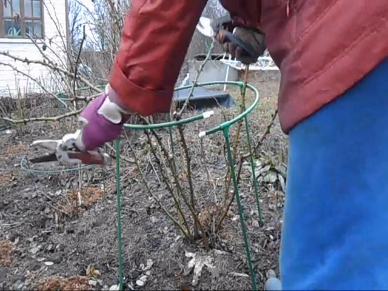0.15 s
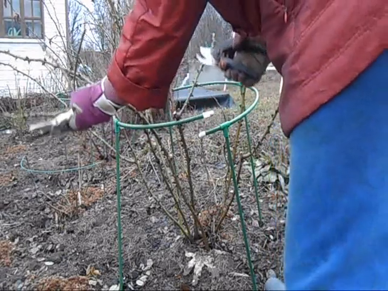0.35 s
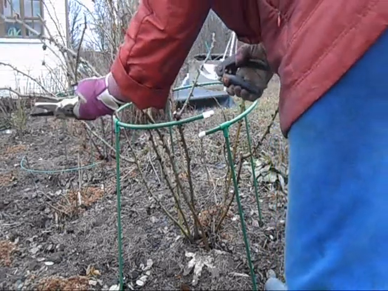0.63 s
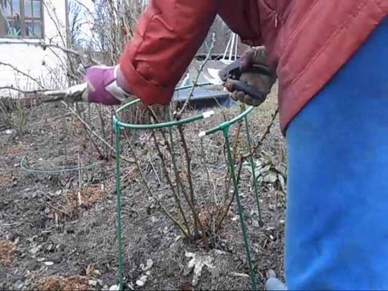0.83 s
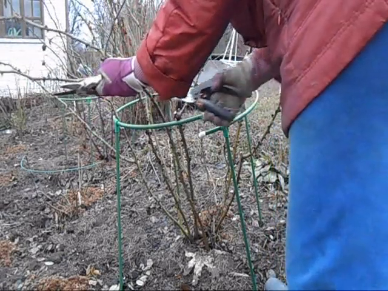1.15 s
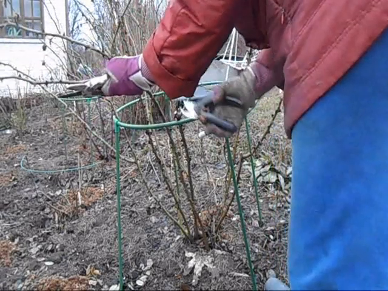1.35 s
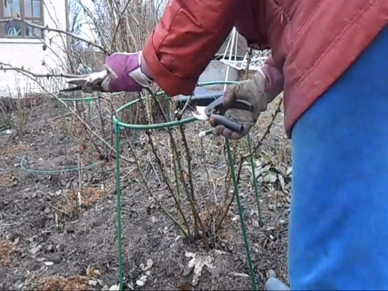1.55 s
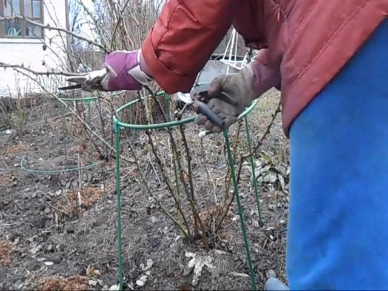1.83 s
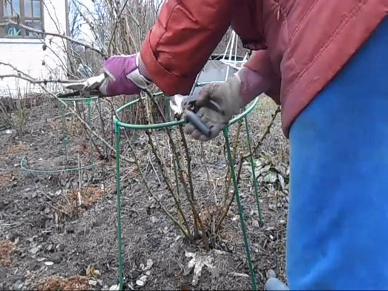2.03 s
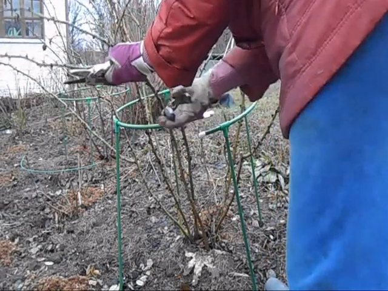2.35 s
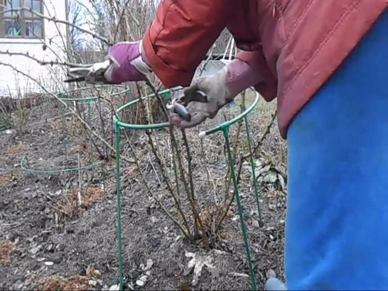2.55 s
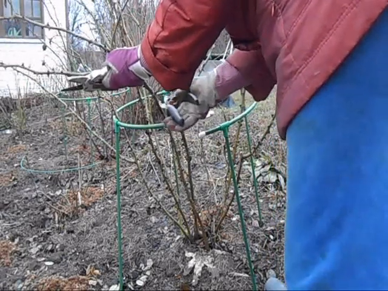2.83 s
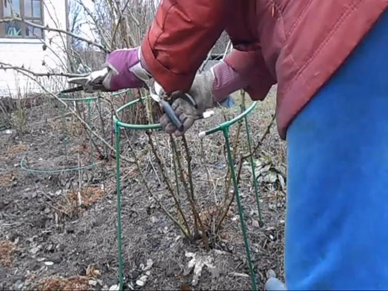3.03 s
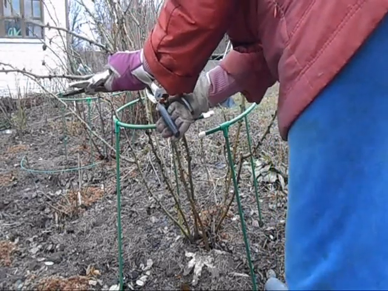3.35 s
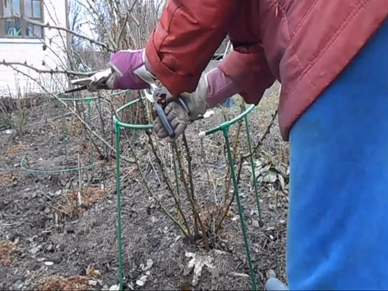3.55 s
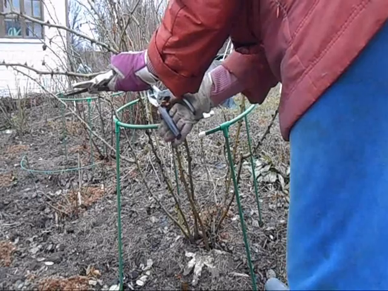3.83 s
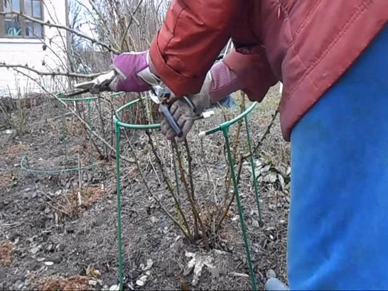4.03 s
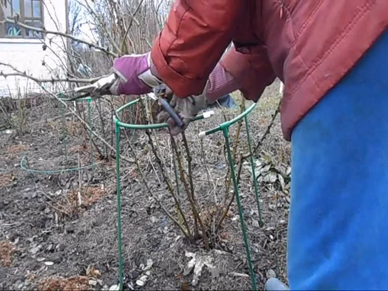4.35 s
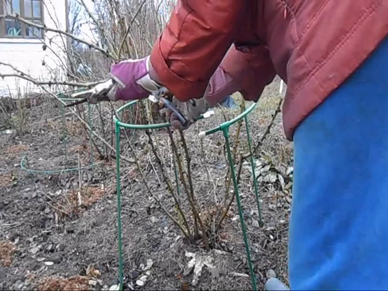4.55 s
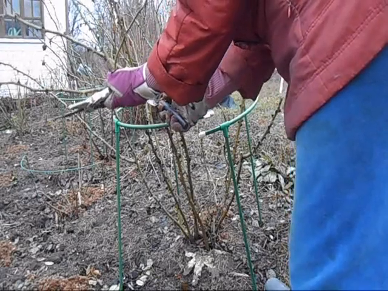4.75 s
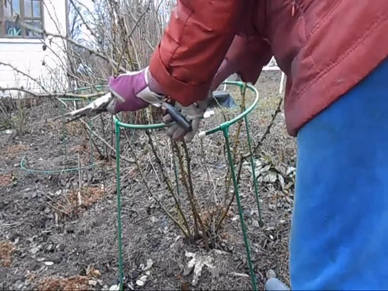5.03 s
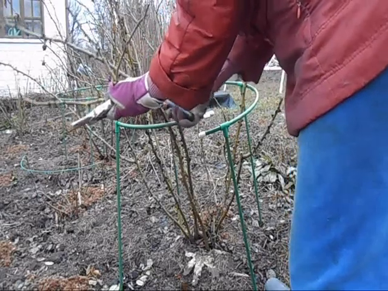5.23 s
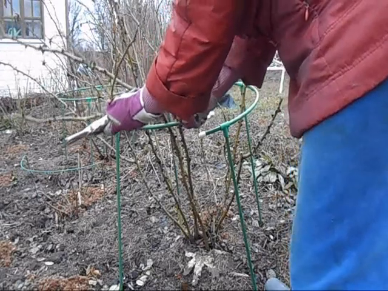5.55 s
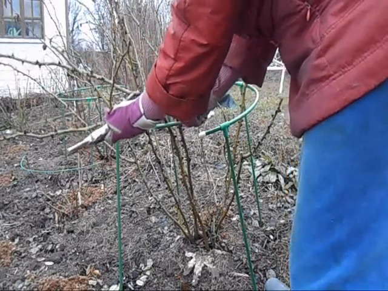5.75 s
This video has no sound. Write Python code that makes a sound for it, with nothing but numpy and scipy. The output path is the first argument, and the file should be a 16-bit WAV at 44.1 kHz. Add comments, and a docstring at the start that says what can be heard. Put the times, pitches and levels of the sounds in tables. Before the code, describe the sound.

Right at the start, hand shears cut a rose stem with a sharp, close double snap. Jacket sleeves swish while a small bird nearby gives three thin, very high whistles in the first half second. Thorns scratch lightly on cloth from 0.6 seconds, and the steel jaws clack twice at about 1.1 and 1.2 seconds. The rustling then softens. The bird makes short, hoarse notes around 2.2 to 2.5 seconds and falling chirps around 2.7 to 3.2, while a farther bird gives six quick buzzes between 2.5 and 3.5. Canes scrape faintly at 3.2 seconds. From 4.3 seconds thorn scratches and rustling return and build, with more hoarse bird notes, until the loudest stem snap at 5.6 seconds, surrounded by a high whistle and a falling chirp. Quiet outdoor air with a faint low drone runs underneath, and the birds carry a slight echo.

```python
"""Hand shears prune a rose bush: stems snap, steel jaws clack, thorns scratch on cloth, canes rub.
The gardener's jacket folds, slides and crinkles. A small bird whistles, chips and scolds nearby;
another buzzes farther off. Trees and a wall echo shears and birds over quiet air and a faint drone.
A pocket camera samples it all at half rate and holds each sample twice."""
import sys
import numpy as np
from scipy import signal
from scipy.fft import rfft, irfft, next_fast_len
from scipy.io import wavfile
from scipy.ndimage import map_coordinates

SR = 44100
rng = np.random.default_rng(int(sys.argv[2]) if len(sys.argv) > 2 else 0)


def generate_wav(signal):
    """Clip the signal to [-1, 1] and save it as 16-bit WAV at the path in sys.argv[1]."""
    frames = np.transpose(np.atleast_2d(signal))
    scaled = np.clip(frames, -1, 1) * 32767
    pcm = np.round(scaled).astype(np.int16)
    wavfile.write(sys.argv[1], SR, pcm)


N = 259659

# Table levels are relative; the functions apply further gain.
# Stems breaking. Each row: start in seconds, level in dB, pitch in Hz, splinter level in dB.
SNAPS = [(0.0455, -15, 3030, -30), (0.0850, -3.5, 2180, -40), (5.614, 1, 1810, -11.5)]
# Jaws and handles knocking. Each row: start in seconds, level in dB, cane thump in dB.
CLACKS = [(1.0757, -20.5, -28.5), (1.107, -33.5, -34.5), (1.177, -36, -35.5), (1.2414, -18.5, -27),
          (1.3449, -30.5, -42)]
# Steel resonances. Each row: frequency in Hz, level in dB, T60 in seconds.
SHEAR_MODES = [(470.5, -17, 0.19), (718, -18, 0.11), (1090, -12, 0.024), (1630, 0, 0.049),
               (2070, -2.5, 0.036), (2330, -16, 0.033), (2870, -4.5, 0.047), (3430, -8, 0.034),
               (3770, 5.5, 0.024), (4520, 3, 0.013), (4930, -8, .016), (5950, -21, .015)]
# Fibres tearing, thorns on cloth. Each row: start in seconds, level in dB, decay in seconds, pitch in Hz.
SCRATCHES = [(0.622, -40, 0.049, 3740), (0.687, -34, 0.016, 3220), (0.9, -29, 0.0083, 5100),
             (1.092, -35, 0.019, 3600), (4.3195, -45.5, 0.0056, 3100), (4.385, -34.5, .022, 4430),
             (4.66, -40.5, 0.0048, 3900), (4.682, -37, .007, 4120), (5.306, -32.5, 0.0089, 3240),
             (5.421, -35, .007, 4540), (5.477, -28, 0.0099, 3000), (5.581, -32, 0.016, 4400),
             (5.656, -28, 0.013, 3850), (5.726, -37, 0.033, 4430)]
# Cane on cane. Each row: start in seconds, level in dB, decay in seconds.
RUBS = [(3.223, -42.5, 0.027), (3.246, -43, .05)]
# Spectra of cracking fibre, rubbed cane, sliding cloth, folding cloth and distant air.
# Each row: frequency in Hz, level in dB.
FIBRE_SPECTRUM = [(300, -39), (1000, 17.5), (2500, 10), (4500, 15), (7000, 8.5), (10000, -20)]
CANE_SPECTRUM = [(150, -14), (450, -1.5), (900, -1), (2200, -0.5), (4000, -2), (8000, -25)]
SWISH_SPECTRUM = [(150, -24.5), (300, -12), (600, -7.5), (1100, -4), (2200, 2), (4000, -1.5), (6500, -6.5),
                  (8000, -9), (10300, -24.5)]
FOLD_SPECTRUM = [(50, -8.5), (100, -7), (240, -5.5), (520, 0.5), (850, 0.5), (1400, -1.5), (4000, -28),
                 (7000, -82)]
AIR_SPECTRUM = [(15, -21), (30, -26), (60, 5), (150, 2), (400, 5), (900, 4), (2100, 2), (4700, -3.5),
                (6500, -15), (10300, -43)]
# The gardener's briskness. Each row: time in seconds, rustle in dB.
MOVEMENT = [(0.0, -36), (0.23, -39), (0.41, -42.5), (1.16, -49), (1.36, -45.5), (1.62, -52.5), (1.98, -52),
            (2.5, -51.5), (2.64, -55), (2.88, -55), (3.34, -51.5), (4.11, -60), (4.39, -59), (4.58, -52.5),
            (5.29, -47.5), (5.52, -43), (5.75, -47.5), (5.88, -50)]
# Sleeve strokes. Each row: centre in seconds, length in seconds, swish in dB, fold in dB.
STROKES = [(0.032, 0.17, -30.5, -48), (0.31, 0.28, -34.5, -51), (0.617, 0.34, -49.5, -50.5),
           (1.046, 0.52, -42.5, -51), (1.533, 0.67, -55, -50.5), (2.397, .2, -49, -59),
           (2.613, 0.19, -49, -59), (3.408, 0.69, -73, -58.5), (4.508, 0.27, -46.5, -66.5),
           (4.846, 0.32, -47.5, -54.5), (5.33, 0.12, -46.5, -78), (5.408, 0.1, -45, -49)]
# Near bird's held whistles and falling slurs.
# Each row: start in seconds, length in seconds, start pitch in Hz, level in dB.
WHISTLES = [(0.0, 0.09, 7600, -28), (0.167, 0.12, 7720, -30.5), (0.374, .103, 7270, -32.5),
            (5.481, .21, 7560, -36)]
SLURS = [(2.709, 0.14, 8420, -36.5), (2.903, 0.13, 8350, -34.5), (3.126, 0.0707, 7380, -29.5),
         (5.785, 0.12, 8120, -35.5)]
# Its high chips and hoarse scolds. Each row: start in seconds, top pitch in Hz, level in dB.
CHIPS = [(0.75, 8670, -48), (2.04, 9200, -58.5), (5.024, 9500, -56.5)]
SCOLDS = [(1.008, 6100, -46.5), (1.122, 6080, -44.5), (2.164, 6100, -49), (2.263, 5890, -46),
          (2.342, 5840, -44.5), (2.434, 5680, -43.5), (5.193, 5750, -43.5), (5.286, 5500, -43)]
# Scold timbre; harmonic 6 carries the listed pitch. Each row: harmonic number, level in dB.
SCOLD_PARTIALS = [(4, -5.5), (5, -10), (6, 1.5), (7, -1.5)]
# Far bird's buzzes.
# Each row: start in seconds, length in seconds, pitch in Hz, sweep as a share of pitch, level in dB.
BUZZES = [(2.485, .055, 4650, 0.092, -43.5), (2.68, 0.052, 4910, 0.16, -44.5),
          (2.864, 0.085, 4930, 0.28, -45.5), (3.064, 0.072, 4860, 0.31, -38.5),
          (3.281, 0.054, 4870, 0.28, -37), (3.477, 0.048, 5000, 0.25, -39.5)]
# Its glides. Each row: start in seconds, length in seconds, start and end pitch in Hz, level in dB.
GLIDES = [(0.77, 0.135, 2125, 2050, -51), (3.626, .25, 5260, 5010, -50.5), (3.716, 0.1, 4150, 3050, -59)]
# Echo decay among the trees. Each row: frequency in Hz, T60 in seconds.
ECHO_DECAY = [(200, 0.33), (2000, 0.15), (5000, 0.59), (10000, 0.13)]


def stem_snaps(peak_cycles=0.67, crack_t60_s=0.02, crack_db=-18, split_s=0.0032, split_width_s=0.0011):
    """A stem gives in one heavily damped swing; its last fibres splinter just after."""
    out, t = np.zeros(N), clock(0.048)
    wood_spectrum = [(400, -38), (1200, 1), (2100, 8), (3800, -6), (6300, 0.5), (10000, -13)]
    for start_s, db, hz, splinter_db in SNAPS:
        u = t * hz / peak_cycles
        swing = np.sin(2 * np.pi * hz * t) * (u * np.exp(1 - u)) ** 3
        crack = amp(crack_db - 60 * t / crack_t60_s) * noise(len(t), FIBRE_SPECTRUM)
        burst = np.exp(-abs(t - split_s) / split_width_s) * np.minimum(t / split_s, 1)
        splinters = amp(splinter_db) * noise(len(t), wood_spectrum) * burst
        add(out, start_s, amp(db) * (swing + crack + splinters))
    # a thin stem radiates little bass
    return signal.lfilter(*signal.butter(1, 1300, "high", fs=SR), out)


def jaw_clacks(ring_db=-3, crack_t60_s=0.027, thump_t60_s=0.11):
    """The jaws shut with a crack; the gloved hand damps the steel's ring, and the shaken cane thumps."""
    out, t = np.zeros(N), clock(0.11)
    thump_spectrum = [(120, -19), (300, -9), (480, -2), (1000, -1.5), (2000, -11), (5000, -57)]
    for start_s, db, thump_db in CLACKS:
        ring = np.zeros(len(t))
        for hz, mode_db, t60_s in SHEAR_MODES:
            decay = amp(mode_db + rng.normal(0, 1) - 60 * t / t60_s)
            ring += decay * np.sin(2 * np.pi * (hz * rng.normal(1, 0.016) * t + rng.random()))
        ring *= 1 - np.exp(-t / 0.00038)
        crack = noise(len(t), FIBRE_SPECTRUM) * amp(-60 * t / crack_t60_s)
        thump = noise(len(t), thump_spectrum) * amp(thump_db - 60 * t / thump_t60_s)
        thump *= 1 - np.exp(-t / 0.0087)
        add(out, start_s, amp(db) * (amp(ring_db) * ring + crack) + thump)
    return out


def thorn_scratches(gain_db=-1.5, tick_db=1):
    """A thorn catches with a tick and runs on in tiny fractures, strongest around one pitch."""
    out, t = np.zeros(N), clock(0.1)
    for start_s, db, decay_s, hz in SCRATCHES:
        spectrum = [(hz / 8, -19), (hz / 2, -4), (hz, 0), (hz * 1.48, -4), (hz * 3, -18), (hz * 8, -40)]
        fractures = coloured(grains(len(t), spread_db=3, rate_hz=1500), spectrum)
        tick = amp(tick_db) * np.sin(2 * np.pi * hz * t) * hz * t * np.exp(1 - hz * t)
        add(out, start_s, amp(db + gain_db) * (tick + fractures * np.exp(-2 * t / decay_s)))
    return out


def cane_rubs():
    """One cane catches on another and slides off with a dull, woody scrape."""
    out, t = np.zeros(N), clock(0.15)
    for start_s, db, decay_s in RUBS:
        scrape = coloured(grains(len(t), spread_db=3, rate_hz=400), CANE_SPECTRUM)
        add(out, start_s, amp(db) * scrape * np.exp(-t / decay_s))
    return out


def jacket(fold_db=-5.5, fold_growth=0.84, swish_db=0.32, swish_growth=1.183,
           crinkle_db=-14, crinkles_per_s=130):
    """Cloth folds softly, swishes in small slips as it slides on itself, and crinkles as creases give."""
    t, brisk_db = np.arange(N) / SR, movement_db()
    mean_db = brisk_db.mean()
    sliding = amp(mean_db + swish_db + swish_growth * (brisk_db - mean_db))
    folding = amp(mean_db + fold_db + fold_growth * (brisk_db - mean_db))
    for centre_s, length_s, slide_db, bend_db in STROKES:
        stroke = swell((t - centre_s) / length_s + 0.5, 0.47)
        sliding = np.hypot(sliding, amp(slide_db) * stroke)
        folding = np.hypot(folding, amp(bend_db) * stroke)
    folds = noise(N, FOLD_SPECTRUM) * folding
    slips = coloured(grains(N, spread_db=1.5, rate_hz=980), SWISH_SPECTRUM) * amp(0.59 * wobble(45))
    impulses = rng.standard_normal(N) * (rng.random(N) < crinkles_per_s / SR)
    crinkles = amp(crinkle_db) * coloured(impulses, FIBRE_SPECTRUM)
    return folds + (slips + crinkles) * sliding


def movement_db():
    """The gardener's briskness at each sample."""
    return np.interp(np.arange(N) / SR, *np.transpose(MOVEMENT))


def near_bird(sag_hz=203, droop_s=0.013, fall_hz_per_s=11800, short_note_s=0.045, rasp=0.0081):
    """Thin drooping whistles, falling slurs, arched chips, and hoarse scolds of close partials."""
    out = np.zeros(N)
    for start_s, length_s, start_hz, db in WHISTLES:
        t = clock(length_s)
        droop_hz = 950 * np.exp((t - length_s) / droop_s)
        hz = start_hz - sag_hz * t / length_s - droop_hz
        add(out, start_s, amp(db - 5) * thin_note(hz, grow_db=8.5))
    for start_s, length_s, start_hz, db in doubled(SLURS, lead_s=0.055, lead_db=-6):
        t = clock(length_s)
        droop_hz = 250 * np.exp((t - length_s) / droop_s)
        hz = start_hz - fall_hz_per_s * t - droop_hz
        add(out, start_s, amp(db - 8) * thin_note(hz, grow_db=9))
    u = clock(short_note_s) / short_note_s
    for start_s, top_hz, db in doubled(CHIPS, lead_s=0.046, lead_db=-1.5):
        hz = top_hz * (1 - 0.22 * (2 * u - 1) ** 2)
        flutter_db = 5.8 * wobble(170, len(u))
        add(out, start_s, amp(db - 2 + flutter_db) * swell(u, 0.12) * np.sin(phase(hz)))
    for start_s, top_hz, db in doubled(SCOLDS, lead_s=0.046, lead_db=-5.5):
        hz = top_hz * (1 - 0.26 * abs(2 * u - 1) ** 2.6)
        hz *= 1 + rasp * wobble(820, len(u))
        base_phase = phase(hz / 6)
        note = sum(amp(partial_db + 3.1 * wobble(230, len(u))) * np.sin(harmonic * base_phase)
                   for harmonic, partial_db in SCOLD_PARTIALS)
        add(out, start_s, amp(db - 3) * swell(u, 0.25) * np.sqrt(2) * note)
    return out


def thin_note(hz, grow_db, waver=0.0095):
    """An unsteady pure note along a pitch curve, growing louder to its end."""
    u = np.arange(len(hz)) / len(hz)
    effort = amp(grow_db * (u - 1) + 3.9 * wobble(114, len(u)))
    fade_in = np.sin(np.pi / 2 * np.minimum(u / 0.25, 1))
    tone = np.sin(phase(hz * (1 + waver * wobble(377, len(u)))))
    return effort * fade_in * swell(u, 0.032) * tone


def doubled(notes, lead_s, lead_db):
    """Each note with a softer copy just ahead of it."""
    return [row for start_s, *shape, db in notes
            for row in ((start_s - lead_s, *shape, db + lead_db), (start_s, *shape, db))]


def far_bird(sweeps_per_s=86, scoop_hz=1340, scoop_s=0.011, pulsing=0.81, trail_hz=4800, trail_s=0.094):
    """Buzzes climb to pitch in quick downward sweeps and trail off on a faint tone; glides rasp a little."""
    out, trail_u = np.zeros(N), clock(trail_s) / trail_s
    for start_s, length_s, main_hz, sweep, db in BUZZES:
        t = clock(length_s)
        cycle, scoop = (t * sweeps_per_s) % 1, np.exp(-t / scoop_s)
        hz = (main_hz - scoop_hz * scoop) * (1 + sweep * (0.5 - cycle))
        # the voice gains strength as it climbs and fades between sweeps
        pulse = (1 - scoop) * (1 - pulsing * np.cos(np.pi * cycle) ** 2)
        add(out, start_s, amp(db + 3.5) * swell(t / length_s, 0.19) * pulse * np.sin(phase(hz)))
        trail = np.sin(phase(trail_hz * (1 + 0.0084 * wobble(400, len(trail_u)))))
        add(out, start_s + length_s, amp(db - 8) * swell(trail_u, 0.15) * (1 - trail_u) * trail)
    for start_s, length_s, start_hz, end_hz, db in GLIDES:
        u = clock(length_s) / length_s
        hz = (start_hz + (end_hz - start_hz) * u) * (1 + 0.015 * wobble(500, len(u)))
        add(out, start_s, amp(db + 3) * swell(u, 0.044) * np.sin(phase(hz)))
    return out


def tree_echo(x):
    """Trunks and a house wall scatter a thin, lingering echo."""
    hz, t, bins = signal.stft(rng.standard_normal(SR // 2), SR, nperseg=256)
    decay = amp(-60 * t / along(ECHO_DECAY, hz)[:, None])
    tail = signal.istft(bins * decay, SR, nperseg=256)[1]
    return signal.fftconvolve(x, tail / np.linalg.norm(tail))[:N]


def garden_air(air_db=-56, drone_hz=72, drone_db=-71, drone_growth=0.34):
    """Distant outdoor air; a faint low drone wavers, a little stronger while the gardener moves."""
    air = noise(N, AIR_SPECTRUM) * amp(air_db + wobble(2.18))
    brisk_db = movement_db()
    drone_gain = amp(drone_db + drone_growth * (brisk_db - brisk_db.mean()) + 3.2 * wobble(14))
    return air + drone_gain * np.sin(phase(drone_hz + 6 * wobble(9.4)))


def amp(db):
    return 10 ** (np.asarray(db) / 20)


def unit_rms(x):
    return x / np.sqrt(np.mean(x ** 2) + 1e-20)


def along(points, hz):
    """Interpolate (Hz, value) points on a log axis."""
    knots_hz, values = np.transpose(points)
    return np.interp(np.log(hz + 1), np.log(knots_hz + 1), values)


def clock(length_s):
    return np.arange(int(length_s * SR)) / SR


def add(track, start_s, sound):
    part = track[max(round(start_s * SR), 0):][:len(sound)]
    part += sound[:len(part)]


def wobble(rate_hz, size=N):
    """A smooth curve through random knots."""
    knots = rng.standard_normal(int(size * rate_hz / SR) + 4)
    return map_coordinates(knots, [np.arange(size) * rate_hz / SR])


def filtered(x, response):
    size = next_fast_len(len(x) + 8192)
    return irfft(rfft(x, size) * response(np.fft.rfftfreq(size, 1 / SR)), size)[:len(x)]


def coloured(x, spectrum):
    """x shaped by (Hz, dB) points, at rms 1."""
    return unit_rms(filtered(x, lambda hz: amp(along(spectrum, hz))))


def noise(size, spectrum):
    return coloured(rng.standard_normal(size), spectrum)


def grains(size, spread_db, rate_hz):
    """White noise broken into tiny slips of uneven strength."""
    return unit_rms(rng.standard_normal(size) * amp(spread_db * wobble(rate_hz, size)))


def phase(hz):
    return 2 * np.pi * np.cumsum(hz) / SR


def swell(u, edge):
    """Soft on, soft off as u runs from 0 to 1."""
    return np.sin(np.pi / 2 * np.clip(np.minimum(u, 1 - u) / edge, 0, 1))


def scene():
    pruning = stem_snaps() + jaw_clacks() + thorn_scratches() + cane_rubs()
    near, far = near_bird(), far_bird()
    echo = tree_echo(amp(-26) * pruning + amp(-12) * near + amp(-5.5) * far)
    return pruning + near + far + echo + jacket() + garden_air()


def record(dry, antialias_hz=10500, top_hz=16000):
    """Holding each half-rate sample twice mirrors the treble into the top octave."""
    band_limited = filtered(dry, lambda hz: 1 / np.sqrt(1 + (hz / antialias_hz) ** 400))
    held = np.repeat(band_limited[::2], 2)[:N]
    return filtered(held, lambda hz: hz < top_hz)


dry = scene()
out = record(dry)
generate_wav(out)
```